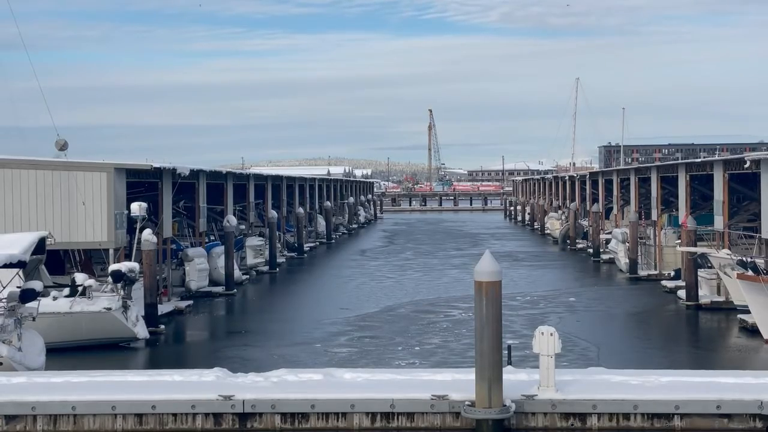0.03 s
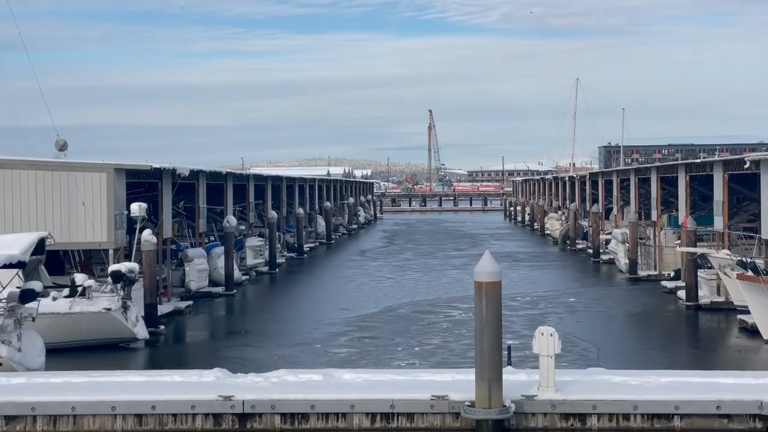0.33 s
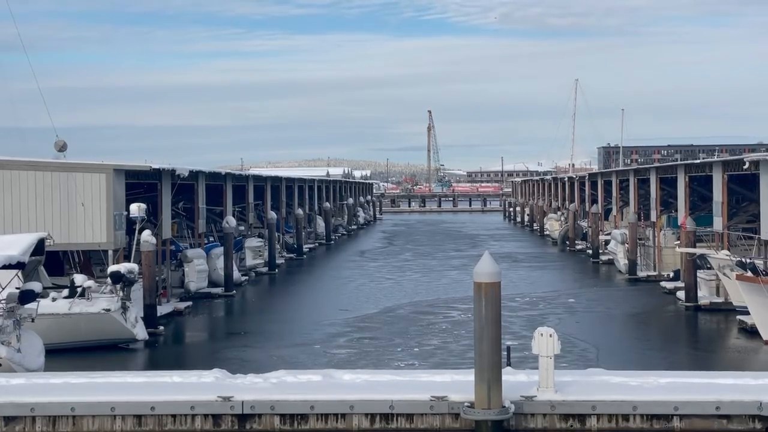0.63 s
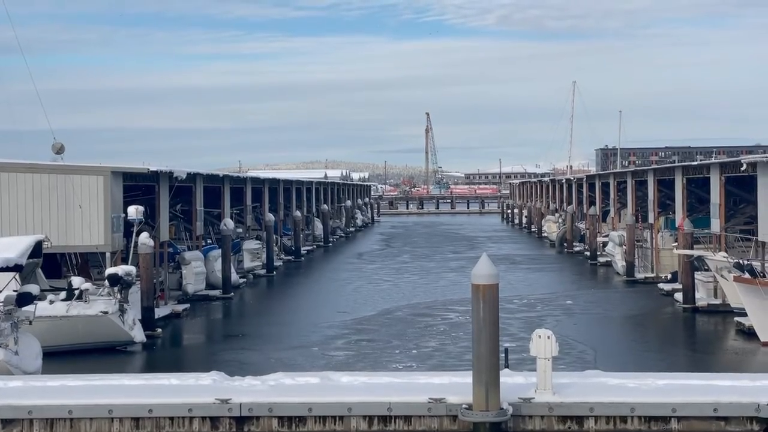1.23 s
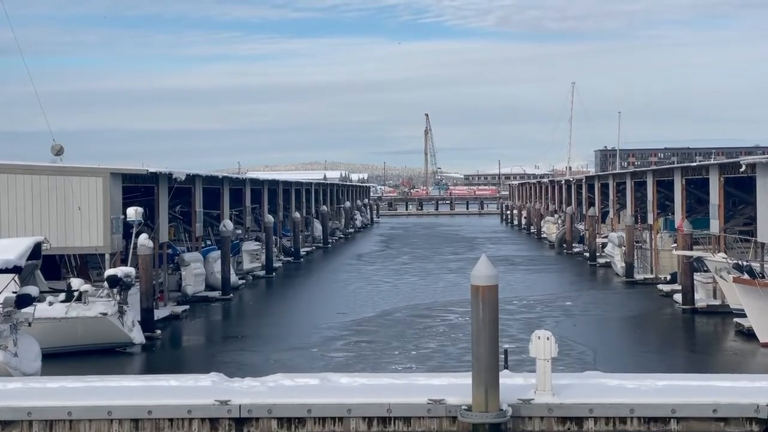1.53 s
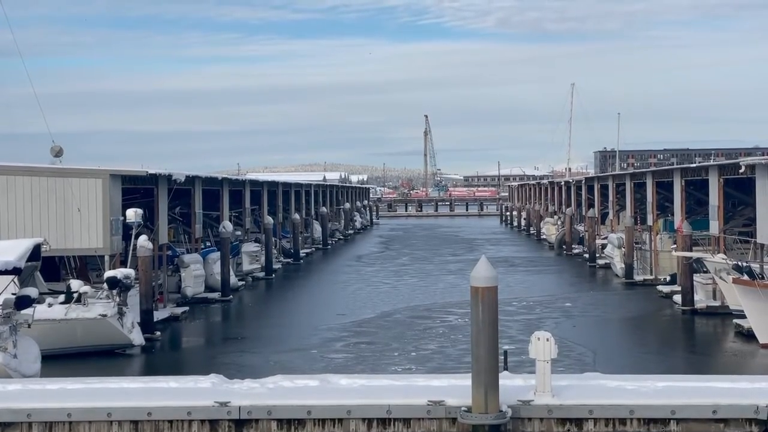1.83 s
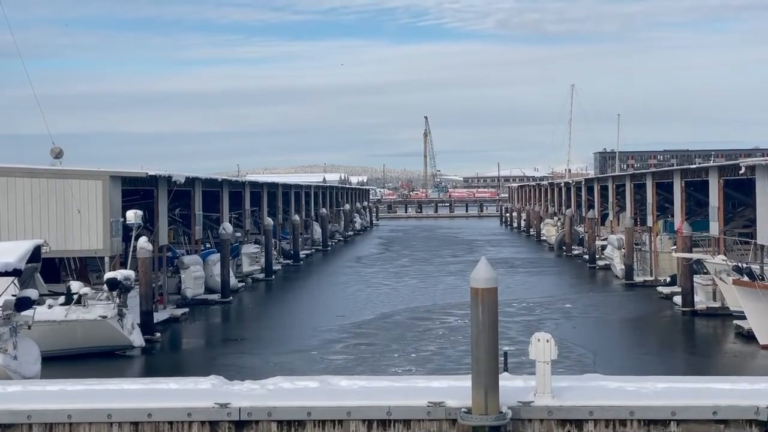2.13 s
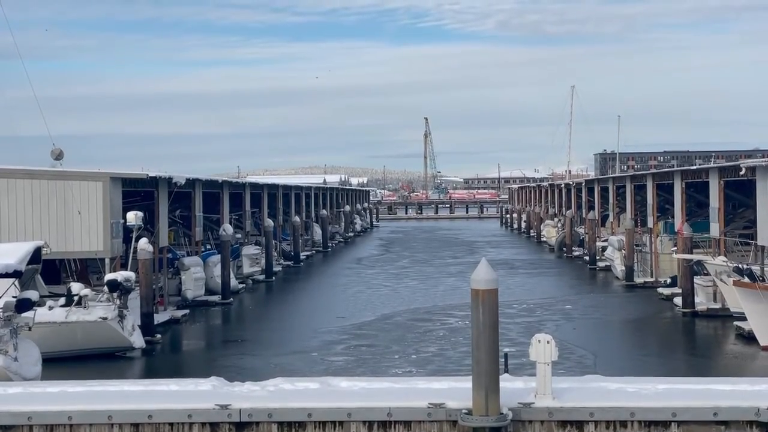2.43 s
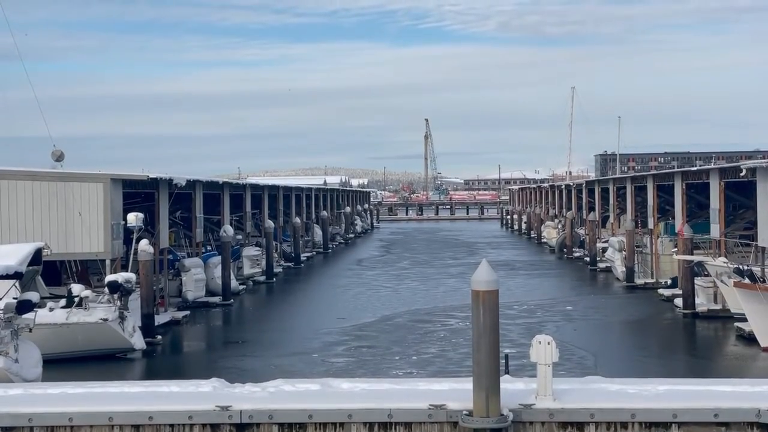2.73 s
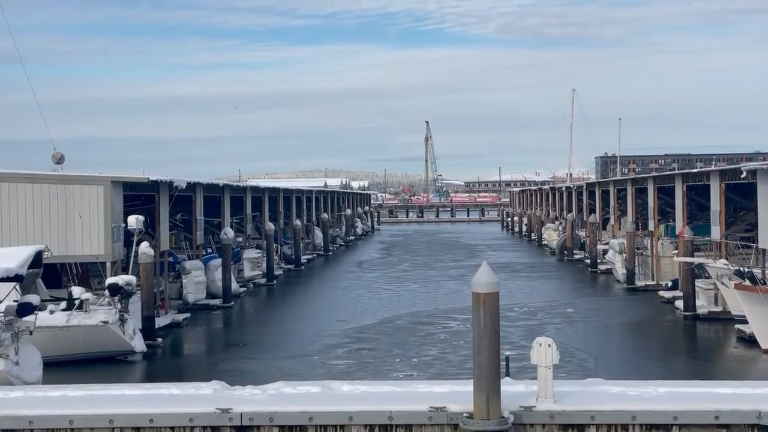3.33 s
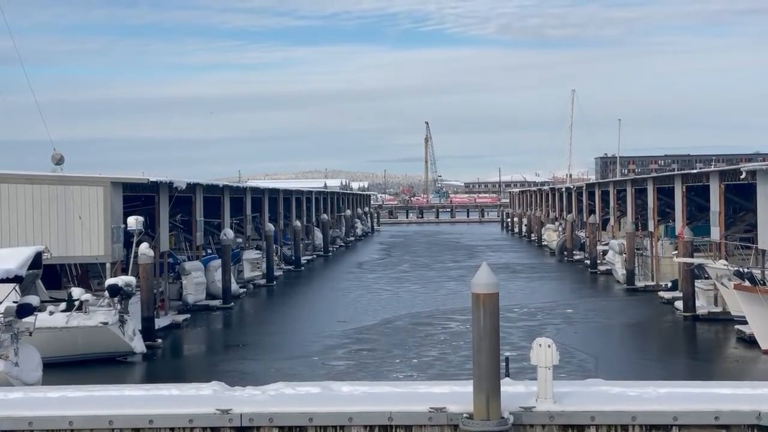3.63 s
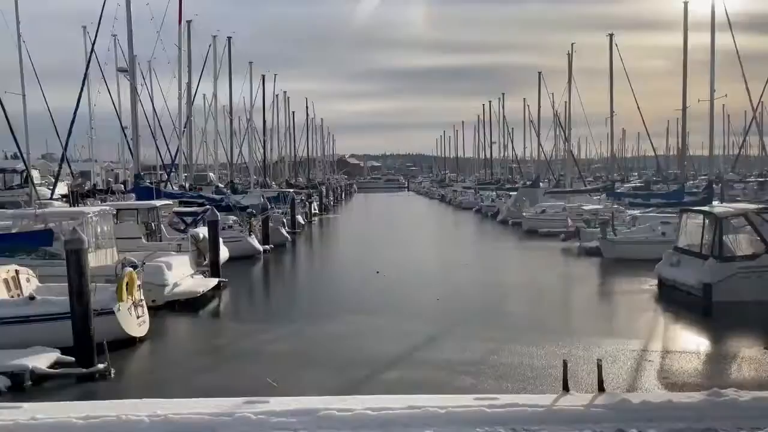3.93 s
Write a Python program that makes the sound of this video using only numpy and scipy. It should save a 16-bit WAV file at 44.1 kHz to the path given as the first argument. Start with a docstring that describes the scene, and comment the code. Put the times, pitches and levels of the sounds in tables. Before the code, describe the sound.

A quiet, low rumble of distant traffic and machinery runs throughout, with a faint hum and light wind on the microphone. A deep swell peaks around 0.3 seconds. A thin, faint whine fades after 1.4 seconds. Tiny ticks sound close by, clearest around 1.8 and 1.9 seconds. At about 3.8 and 4 seconds, a hand softly bumps the microphone twice, ending with a very brief dull rub.

```python
"""A quiet winter marina

Far traffic and machinery rumble across the water, with a faint hum and a thin, fading whine. Light air buffets
the microphone openings, and a deep swell passes near the start. Tiny ticks sound close by, perhaps thawing ice.
Near the end a hand bumps the camera twice, the first bump with a sharp crack, and brushes it."""
import sys
import numpy as np
from scipy import signal
from scipy.fft import rfft, irfft, next_fast_len
from scipy.io import wavfile
from scipy.ndimage import map_coordinates

SR = 44100
rng = np.random.default_rng(int(sys.argv[2]) if len(sys.argv) > 2 else 0)


def log_audio(samples):
    """Write samples as a 16-bit WAV file to the path given in sys.argv[1]."""
    # one column per channel
    frames = np.atleast_2d(samples).T
    # limit to full scale, then quantise
    limited = np.clip(frames, -1, 1)
    pcm = np.round(limited * 32767).astype(np.int16)
    wavfile.write(sys.argv[1], SR, pcm)


N = 176400
T = np.arange(N) / SR


def amp(db):
    """Turn decibels into a number to multiply by."""
    return 10 ** (np.asarray(db) / 20)


def unit(x):
    """Scale a sound to an average strength (rms) of 1."""
    return x / np.sqrt(np.mean(x ** 2) + 1e-20)


def along(points, hz):
    """Read between (pitch [Hz], value) points on a log pitch scale."""
    pitches, values = np.transpose(points)
    return np.interp(np.log(hz + 1), np.log(pitches + 1), values)


def curve(rows):
    """Join (time [s], value) points into one value per sample."""
    return np.interp(T, *np.transpose(rows))


def wobble(rate):
    """A smooth curve through `rate` random values a second."""
    return map_coordinates(rng.standard_normal(400), [T * rate + 2], mode="wrap")


def filtered(x, response):
    """Multiply each frequency in x by response(hz)."""
    size = next_fast_len(N + 8192)
    return irfft(rfft(x, size) * response(np.fft.rfftfreq(size, 1 / SR)), size)[..., :N]


def rush(spectrum, alike):
    """Stereo noise from (pitch [Hz], level [dB]) and (pitch [Hz], left-right likeness [1 = same])."""
    def response(hz):
        spread = np.arccos(np.clip(along(alike, hz), -1, 1)) / 2
        return amp(along(spectrum, hz)) * [np.cos(spread), np.sin(spread)]
    mid, side = filtered(rng.standard_normal((2, N)), response)
    return unit(np.array([mid + side, mid - side]))


def traffic():
    """Far traffic rumbles: the bass holds steady while the higher part drifts in level."""
    # tone of the rumble (pitch [Hz], level [dB])
    spectrum = [(20, -9.5), (57, -2), (76, -5.5), (100, -7.5), (140, -11), (241, -16.5), (273, -21),
                (378, -19.5), (420, -24), (500, -24.5), (565, -19), (690, -25.5), (1000, -28.5),
                (1400, -35), (1820, -68), (3080, -120)]
    # how alike left and right are (pitch [Hz], likeness [-1 to 1])
    alike = [(60, 1), (150, 0.96), (300, 0.5), (560, -0.004), (1050, -0.45), (1400, 0.27)]
    # drift above the bass (time [s], level [dB])
    drift = [(0, 0.5), (.42, 1.5), (.48, 2.5), (.56, 1.5), (.64, -0.5), (1.7, 0), (1.8, 1), (1.92, 0.5),
             (3.15, -0.5)]
    roar = rush(spectrum, alike)
    bass = filtered(roar, lambda hz: 1 / (1 + (hz / 170) ** 4))
    upper = (roar - bass) * amp(curve(drift) + 0.91 * wobble(5.3))
    return amp(-50) * (bass + upper)


def traffic_hiss():
    """Three bands of far hiss waver above the rumble."""
    # tone of the main hiss (pitch [Hz], level [dB])
    main_tone = [(760, -24), (1300, -14.5), (1500, -6.5), (1560, -3), (1890, -4), (2170, -2.5),
                 (3110, -11.5), (3380, -21), (4680, -34.5), (7920, -120)]
    # its loudness (time [s], level [dB])
    main_level = [(0.05, -71.5), (3.53, -73), (3.67, -71), (3.7, -72.5)]
    # tone of the faint top hiss (pitch [Hz], level [dB])
    top_tone = [(2500, -37), (3500, -6.5), (5400, -17), (7200, -14.5), (8300, -18.5), (13400, -20),
                (14300, -44)]
    # its loudness (time [s], level [dB])
    top_level = [(0, -87.5), (4, -86.5)]
    # tone of a narrow, surging hiss (pitch [Hz], level [dB])
    surge_tone = [(3000, -40), (3900, -9), (4450, 0), (4800, -3), (5800, -50)]
    # its loudness (time [s], level [dB])
    surge_level = [(.3, -89), (.58, -84), (1.15, -85.5), (1.33, -83.5), (1.47, -88), (1.75, -83.5),
                   (2.2, -86.5), (2.7, -83), (2.9, -84.5), (3.5, -81.5)]
    main = amp(curve(main_level) + 0.54 * wobble(6)) * rush(main_tone, [(1300, 0.38), (2000, 1.0)])
    top = amp(curve(top_level) + 0.73 * wobble(9.9)) * rush(top_tone, [(8000, 0.82)])
    surge = amp(curve(surge_level)) * rush(surge_tone, [(4500, 0.81)])
    return main + top + surge


def far_tone(hz, width_hz):
    """A tone that flutters on its way here; more width blurs its pitch more."""
    wave = np.sin(2 * np.pi * hz * T + wobble(width_hz))
    flutter_db = 1.5 * wobble(14)
    return unit(wave * amp(flutter_db))


def machinery():
    """Far machines hum steadily while their whine dies down, its highest tone fastest."""
    # tones of the hum (pitch [Hz], level [dB], width [Hz])
    hum_tones = [(79, -58, 14), (301.5, -73, 6), (392.5, -71, 3), (379, -75, 6), (338, -78, 6)]
    # tones of the whine (pitch [Hz], level [dB], fade multiplier)
    whine_tones = [(1615, -77.5, 1), (1681, -84, .7), (1767, -87, .3), (3530, -93, 1.8)]
    # fade of the whine (time [s], level [dB])
    fade = [(0, 0), (1.4, -1.5), (1.9, -7), (4, -10)]
    hum = sum(amp(db) * far_tone(hz, width) for hz, db, width in hum_tones)
    whine = sum(amp(db + share * curve(fade)) * far_tone(hz, width_hz=4.6)
                for hz, db, share in whine_tones)
    return hum + whine


def wind():
    """Lumps of moving air hit each microphone opening differently."""
    # strength of the gusts (time [s], level [dB])
    gusts = [(0, -67), (.21, -61.5), (.25, -46), (.45, -50.5), (.68, -64), (.95, -50.5), (1.19, -49.5),
             (1.32, -53.5), (1.72, -53.5), (2.2, -60.5), (2.8, -58.5), (3.02, -60.5), (3.35, -54.5),
             (3.7, -52)]
    # their deep tone (pitch [Hz], level [dB])
    spectrum = [(20, -15), (50, 3.5), (72, 5.5), (100, -2.5), (220, -22), (500, -62.5), (1000, -130)]
    lumps = amp(1.7 * np.array([wobble(15), wobble(12)]))
    return amp(curve(gusts)) * unit(lumps * rush(spectrum, alike=[(60, 0.009)]))


def low_swell():
    """A deep boom in the traffic rises and falls in the first half second."""
    # loudness of the boom (time [s], level [dB])
    level = [(0, -62), (.04, -39.5), (.12, -50), (.23, -45.5), (.255, -32.5), (.29, -39), (.33, -36),
             (.42, -56.5), (.5, -89)]
    # its tone (pitch [Hz], level [dB])
    spectrum = [(20, -29), (50, -12.5), (72, 7), (92, 1), (130, -11), (200, -29), (800, -130)]
    return amp(curve(level)) * rush(spectrum, alike=[(80, 0.97)])


def ticks():
    """Tiny snaps, perhaps thawing ice, plus the sharp crack of the hand's first bump at 3.784 s: bursts of
    bright noise with a faint tail."""
    # ticks (time [s], level [dB], time to fade 60 dB [s], pitch [Hz], left minus right [dB])
    events = [(.516, -74.5, 0.011, 10500, 0), (.944, -70, 0.02, 10900, 0), (1.052, -71.5, .012, 9000, 0),
              (1.3435, -68, 0.01, 9500, 3), (1.752, -50, 0.012, 8600, 1), (1.8991, -53.5, 0.006, 5330, 4),
              (1.9012, -48, 0.0038, 11500, 0), (3.421, -72, .01, 10000, 0),
              (3.699, -62, 0.0039, 15500, 0.5), (3.784, -52, .003, 11800, 0),
              (3.8461, -56.5, 0.0064, 6400, -1), (3.853, -71, .07, 6440, 1)]
    # tone that all ticks share (pitch [Hz], level [dB])
    spectrum = [(800, -8), (2500, 7), (4000, -11.5), (7200, -1), (8500, -2), (10500, -5.5), (14500, -5),
                (15600, -18)]
    rise_s, tail_db, tail_fade_s = .00015, -25, 0.17
    boost_db, width_octaves = 11.5, 0.71  # a lift around each tick's own pitch
    out = np.zeros((2, N))
    for start, db, fade_s, centre_hz, pan_db in events:
        def colour(hz):
            octaves = np.log2((hz + 1) / centre_hz)
            return amp(along(spectrum, hz) + boost_db * np.exp(-(octaves / width_octaves) ** 2))
        age = np.maximum(T - start, 0)
        rise = 1 - np.exp(-age / rise_s)
        fade = amp(-60 * age / fade_s) + amp(tail_db - 60 * age / tail_fade_s)
        snap = rise * fade * unit(filtered(rng.standard_normal(N), colour))
        out += amp([[db + pan_db / 2], [db - pan_db / 2]]) * snap
    return out


def ring(age, hz, fade_s):
    """One tone of a struck object, falling 60 dB in fade_s seconds."""
    return amp(-60 * age / fade_s) * np.sin(2 * np.pi * hz * age)


def bumps():
    """Two soft bumps of a hand make the camera's case ring, rock and snap."""
    # bumps (time [s], knock [dB], low thump [dB], snap [dB])
    events = [(3.7838, -32, -38, -48.5), (3.9711, -35.5, -31.5, -69)]
    # tones of the case (pitch [Hz], level [dB], time to fade 60 dB [s])
    case_tones = [(199, 0, 0.027), (557, -5.5, 0.024), (743, -2, 0.021), (867, -3, 0.011)]
    knock_rise_s, thump_rise_s, snap_delay_s = 0.00051, 0.015, 0.0007
    knocks, thumps, snaps = np.zeros((3, N))
    for start, knock_db, thump_db, snap_db in events:
        age = np.maximum(T - start, 0)
        # neighbouring tones start in opposite directions
        case = sum((-1) ** k * amp(db + rng.normal(0, 1)) * ring(age, hz, fade_s)
                   for k, (hz, db, fade_s) in enumerate(case_tones))
        knocks += amp(knock_db) * case * (1 - np.exp(-age / knock_rise_s))
        thumps += amp(thump_db) * ring(age, hz=110, fade_s=0.11) * (1 - np.exp(-age / thump_rise_s))
        snaps += amp(snap_db) * ring(np.maximum(age - snap_delay_s, 0), hz=3200, fade_s=0.0024)
    soften = signal.butter(N=6, Wn=1070, fs=SR, output="sos")  # cuts the treble
    return signal.sosfilt(soften, knocks) + thumps + snaps


def brush():
    """A finger rubs the case, making a sudden dull rustle."""
    # tone of the rub (pitch [Hz], level [dB])
    spectrum = [(30, 28), (90, 39.5), (300, 23.5), (1000, 14), (1900, 0.5), (5000, -2), (8000, -19),
                (10000, -5), (15000, -23)]
    start_s, rise_s = 3.985, 0.00086
    rise = np.clip((T - start_s) / rise_s, 0, 1)
    return amp(-43.5) * rise * rush(spectrum, alike=[(3000, 0.5)])


def scene():
    """Mix the far sounds, a touch to the right, with the wind, more to the left, and the near sounds."""
    far = (traffic() + traffic_hiss() + machinery() + low_swell()) * amp([[-.15], [.15]])
    return far + wind() * amp([[2], [-2]]) + ticks() + bumps() + brush()


def record(dry):
    """The two microphone openings are slightly out of step; the camera cuts the lowest and top sounds."""
    # how far the left wave runs ahead of the right (pitch [Hz], phase [radians])
    left_lead = [(0, 0), (350, -.2), (700, -1.1), (1050, -.9), (1700, .2), (6400, .3), (7200, 1),
                 (8400, 3.1), (15400, 12.4)]
    low_cut_hz, top_hz = 22, 15800

    def response(hz):
        phase = np.interp(hz, *np.transpose(left_lead))
        shift = np.exp(.5j * np.outer([1, -1], phase))
        low_cut = 1 - 1 / (1 + (hz / low_cut_hz) ** 10)
        high_cut = np.clip((top_hz - hz) / 400, 0, 1)
        return shift * low_cut * high_cut
    return filtered(dry, response)


dry = scene()
out = record(dry)
log_audio(out)
```